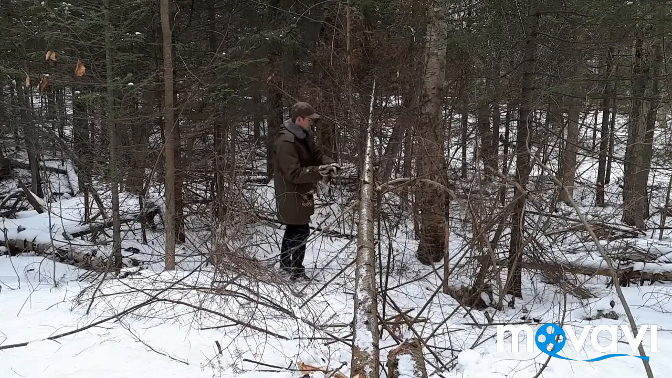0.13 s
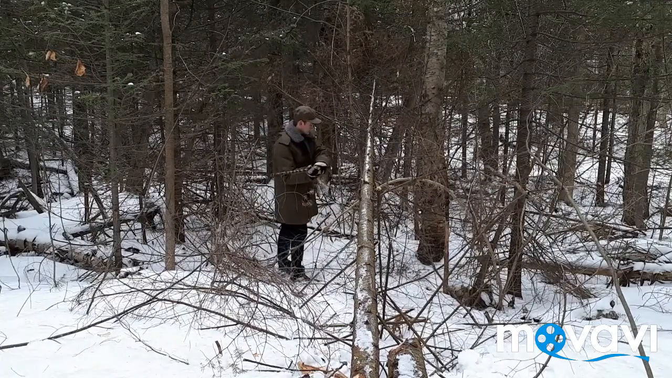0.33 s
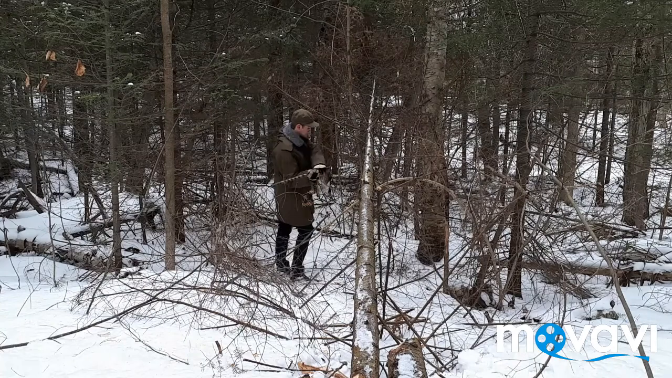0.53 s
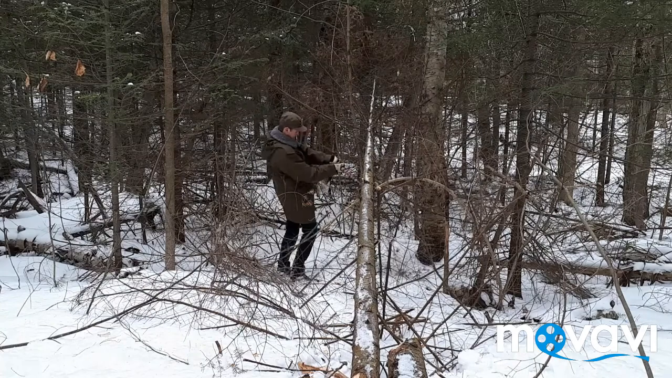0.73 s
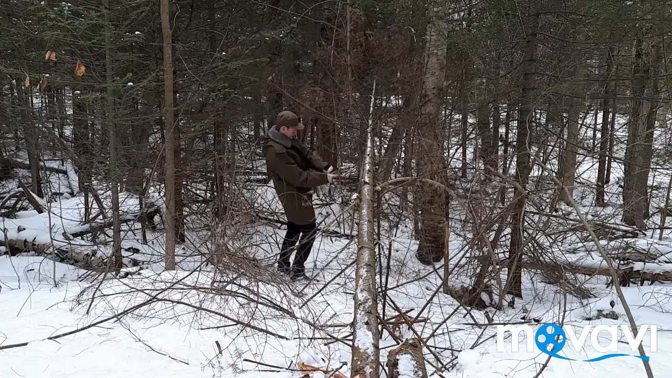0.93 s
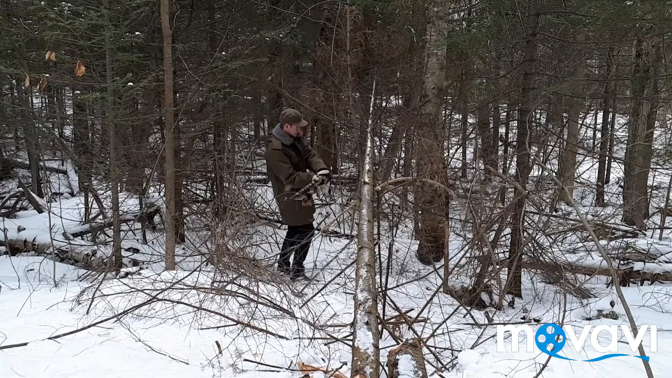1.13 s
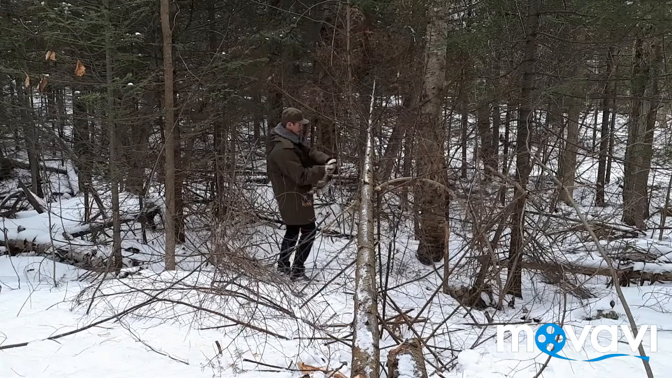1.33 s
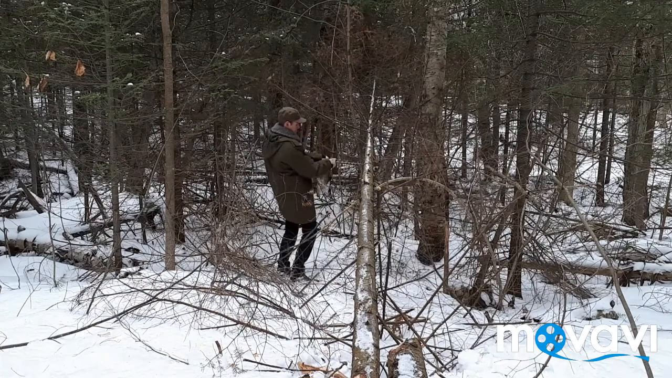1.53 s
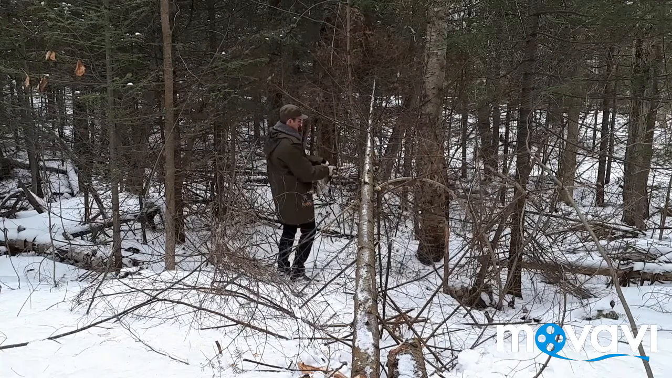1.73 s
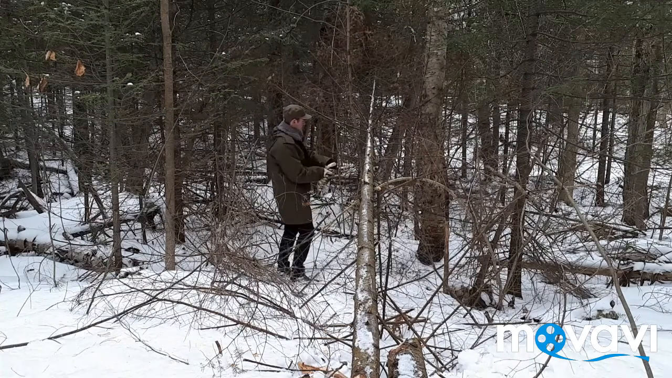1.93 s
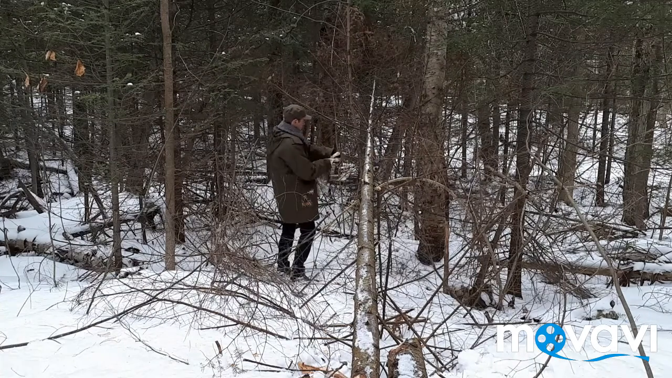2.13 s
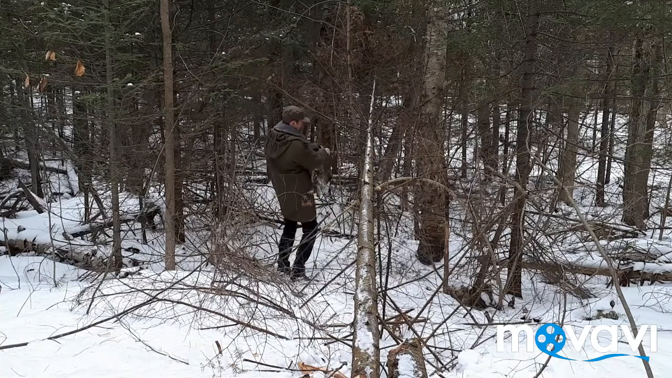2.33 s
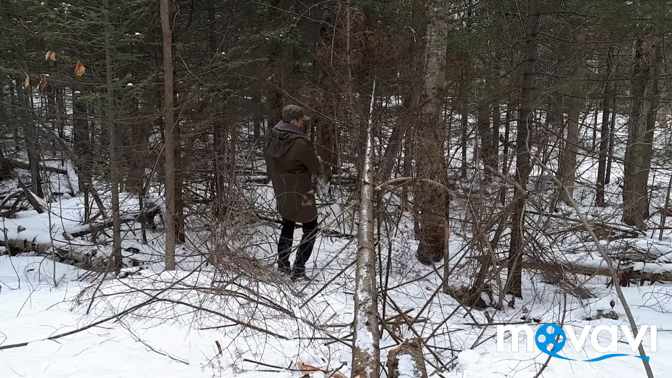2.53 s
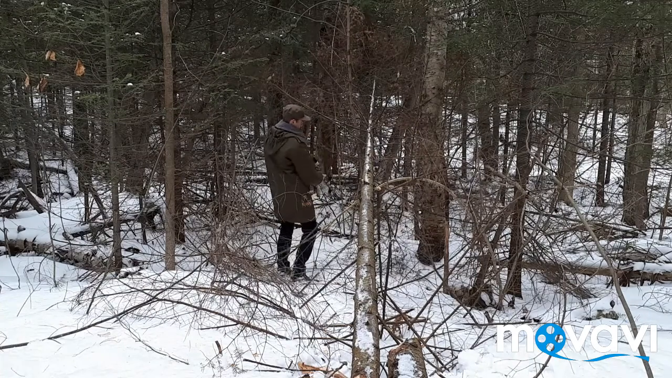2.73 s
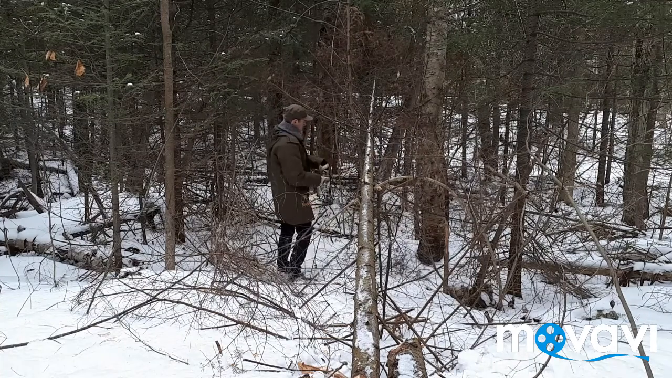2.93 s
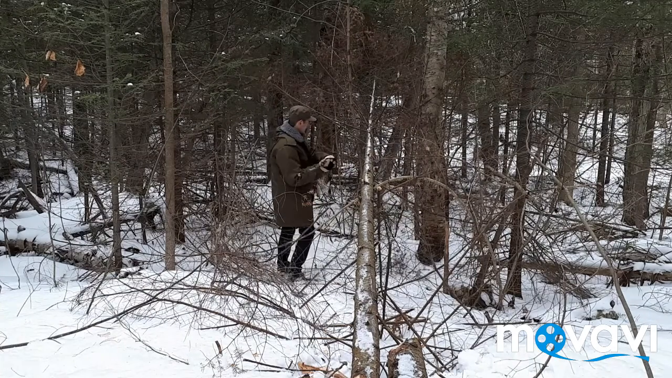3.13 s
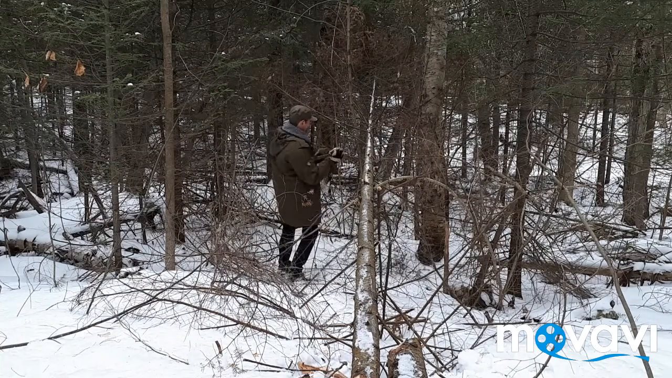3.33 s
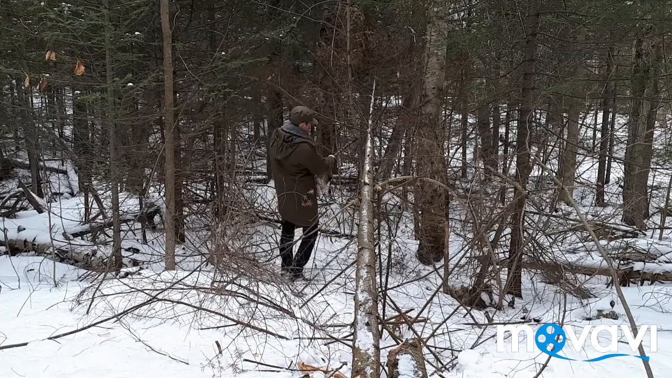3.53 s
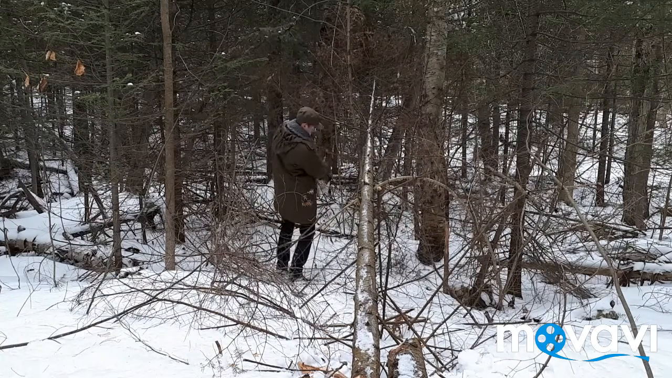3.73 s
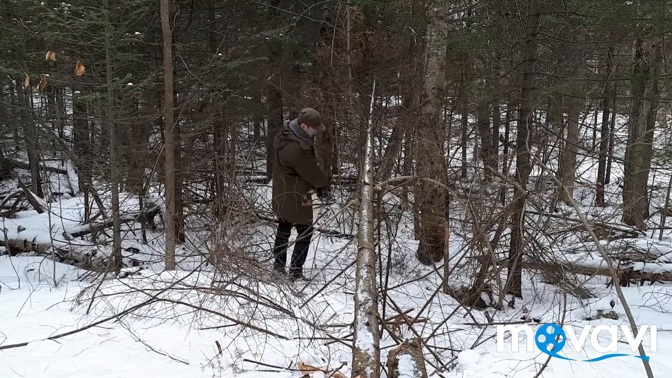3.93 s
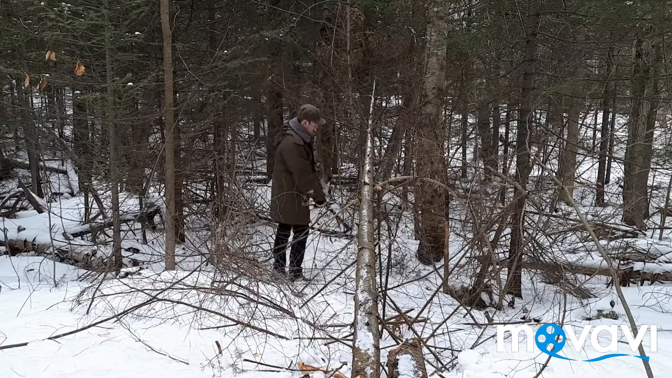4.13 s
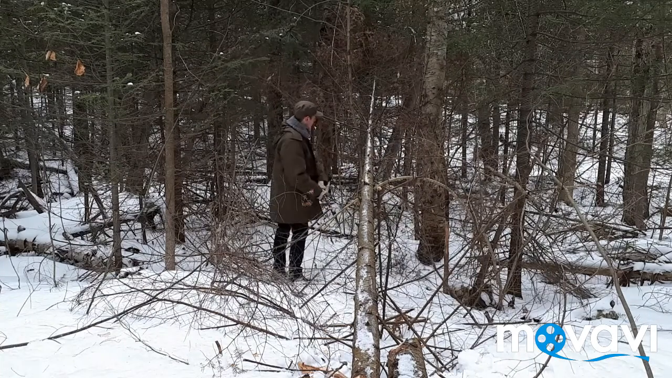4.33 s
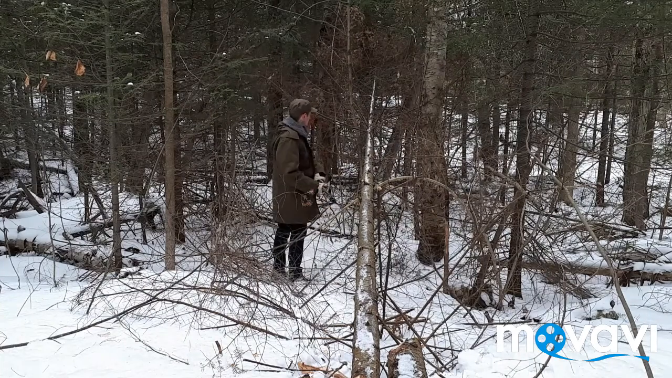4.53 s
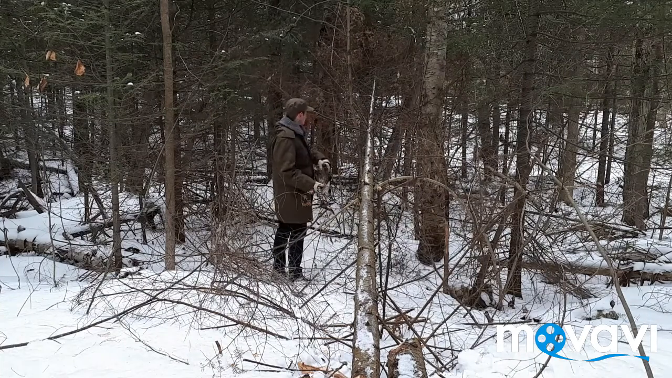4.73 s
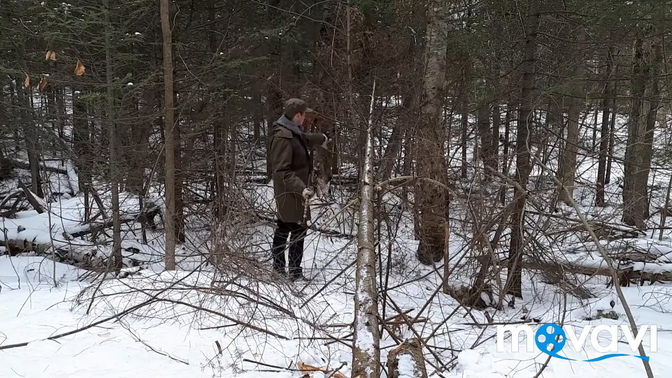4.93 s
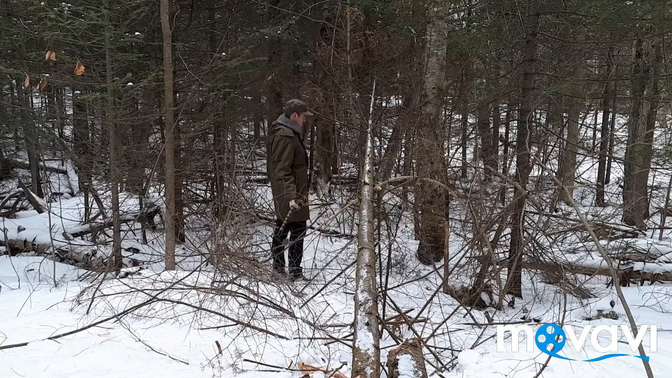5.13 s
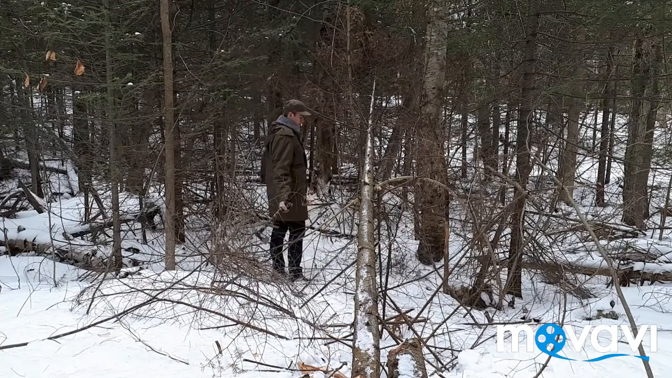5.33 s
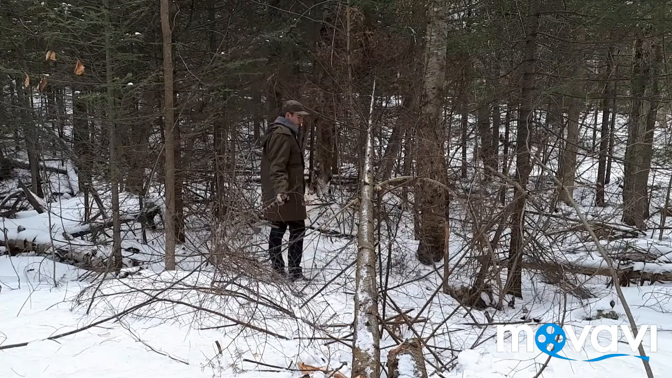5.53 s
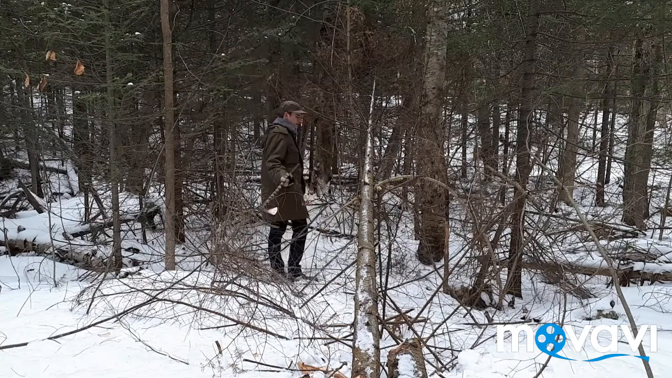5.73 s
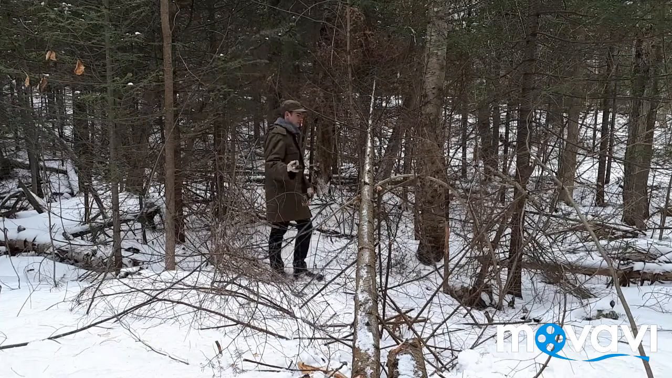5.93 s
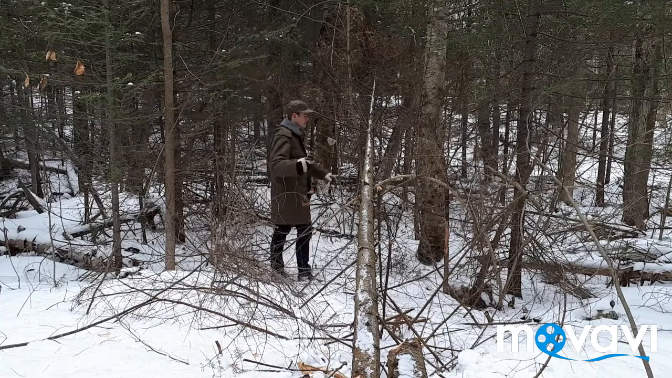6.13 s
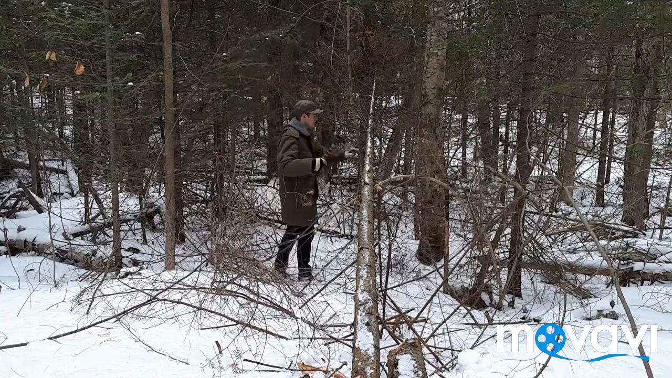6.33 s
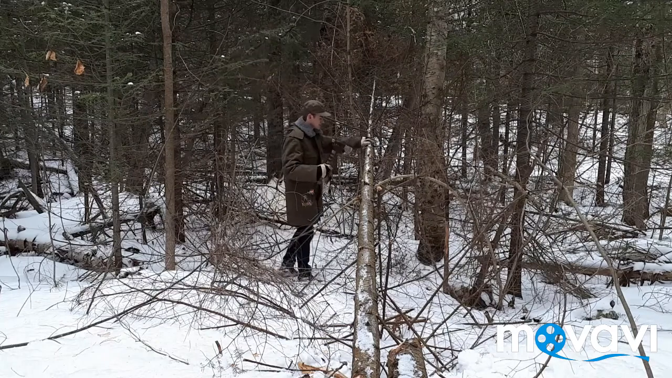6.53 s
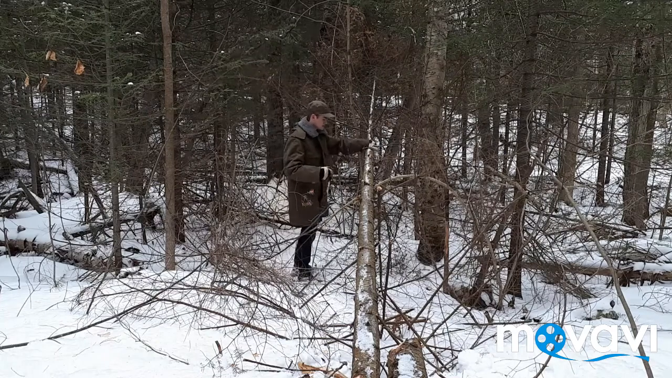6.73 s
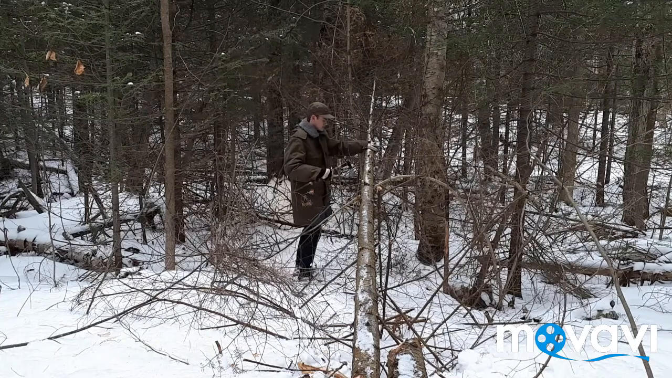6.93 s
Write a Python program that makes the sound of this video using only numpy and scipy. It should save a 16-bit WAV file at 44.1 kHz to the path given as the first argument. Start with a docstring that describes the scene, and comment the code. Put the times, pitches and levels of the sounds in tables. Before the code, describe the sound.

A quiet winter forest with a low, soft distant roar and very faint hiss. At 0.8 s a blade strikes a dead branch: a very loud, dry crack with a low falling knock and brief thin steel ring, scattered by surrounding trunks for about half a second. At 1.5 s a lighter blow rings more brightly, with smaller snaps at 1.6 and 1.7. At 2.3 s another loud splintering crack has a firm knock, then twigs brush and settle until about 3.1. A small tick at 3.2 precedes a deep, duller cluster of cracks at 3.57-3.64. The background dips around 4.3 s and returns. Dry twigs scrape clearly at 5.1-5.4 with a barely audible blade touch, followed by faint scrapes and coat rustle to 6.3. A thin twig snaps at 6.53, and a soft sleeve swish passes at 6.75. Stereo microphone several metres away.

```python
"""Dead branches are knocked off a spruce in a snowy forest: a falling chirp and modes make each
low knock, and short bursts of shaped noise make the cracks, scattered back by the trunks around.
A steel blade bites with a small burst and rings faintly in a few dying modes.
Twigs brush and a coat swishes as clumpy filtered noise, over the noise of a low, distant roar and
a faint hiss; the background level dips for about a second and comes back, the hiss dipping less."""
import sys
import numpy as np
from scipy import signal
from scipy.fft import rfft, irfft
from scipy.io import wavfile

SR = 44100
rng = np.random.default_rng(int(sys.argv[2]) if len(sys.argv) > 2 else 0)


def master(y):
    """Save y as 16-bit WAV."""
    cut = np.clip(np.atleast_2d(y).T, -1, 1)
    pcm = np.round(cut * 32767)  # scale
    wavfile.write(sys.argv[1], SR, pcm.astype(np.int16))


N = 307818

# How alike the two channels are in diffuse sound. Each row: pitch in Hz, coherence from 0 to 1.
COHERENCE = [(60, 0.81), (130, 0.98), (290, 0.88), (640, 0.19), (1400, 0.051), (16000, 0.038)]
# Noise colours of the distant roar and the faint hiss. Each row: pitch in Hz, relative dB per Hz.
ROAR_SPECTRUM = [(12, -57), (20, -28), (92, -6.5), (234, -1.5), (377, -2), (414, -2), (514, -5.5),
                 (752, -11.5), (828, -11.5), (911, -15), (1050, -17), (1500, -29.5), (2730, -40),
                 (5450, -48.5), (6000, -44), (7800, -74), (13200, -120)]
HISS_SPECTRUM = [(500, -4), (2000, 2), (4000, 0), (6500, -2), (7600, 2), (8800, -4), (12000, -3),
                 (15500, -2.5)]
# Noise colours of coat, sleeve and scraping twigs. Each row: pitch in Hz, relative dB per Hz.
COAT_SPECTRUM = [(1000, -22), (4000, -14), (6500, -10), (7400, 0), (7900, 0), (8600, -15), (15500, -15)]
SLEEVE_SPECTRUM = [(200, -19), (900, -2), (2200, 0.5), (3500, -2), (5300, 1), (7900, -1), (9000, -9.5),
                   (15500, -12)]
TWIG_SPECTRUM = [(300, -21), (1500, 1), (2500, -5.5), (5000, -1), (7700, 5.5), (9200, -3.5), (12500, 3),
                 (15500, -6)]
# The coat rubs on itself with each move of the body.
# Each row: middle in seconds, level in dB, half length in seconds.
BODY_MOVES = [(0.576, -79, 0.064), (1.29, -77, .16), (2.003, -77.5, 0.17), (2.8, -77.5, 0.5),
              (5.286, -75, 0.19), (5.905, -75, .09), (6.309, -79, .1), (6.852, -74, 0.13)]
# Twigs bend, slip past and settle.
# Each row: slip in seconds, level in dB, rise and fade time constants in seconds.
TWIG_BRUSHES = [(1.298, -73.5, .008, 0.017), (2.5, -70, .04, 0.38), (2.7, -69.5, 0.11, 0.075),
                (3.07, -69.5, 0.083, 0.071), (5.125, -60, .016, 0.2), (5.25, -59.5, .035, 0.068),
                (5.535, -77, .005, 0.035), (5.645, -72.5, .005, .03), (5.89, -67.5, .005, 0.072),
                (6.155, -72, .005, 0.055), (6.325, -75, .02, .035)]
# The forest's late answer. Each row: pitch in Hz, time to fall by 60 dB in seconds.
FOREST_DECAY = [(100, .3), (350, .35), (900, .55), (1800, .62), (4000, .55), (8000, .52), (15500, .47)]
# Basic colour of splintering wood. Each row: pitch in Hz, relative dB per Hz.
SPLINTER_SPECTRUM = [(40, -30), (150, -12), (400, -4), (800, 1), (1100, -3), (2300, .5), (3200, -2.5),
                     (4300, -.5), (5600, -3.5), (7600, 2), (8900, -7.5), (12000, -4), (15500, -5)]
# Modes of the steel blade, then of a branch.
# Each row: pitch in Hz, relative level in dB, time to fall by 60 dB in seconds.
BLADE_MODES = [(1722, -17, 0.1), (4130, -9.5, 0.13), (6730, 0.5, 0.2), (6850, -5, 0.21)]
BRANCH_MODES = [(337, 1, 0.22), (481, -9.5, .14), (573.3, -6.5, 0.054), (715, -4, 0.071), (942, -13.5, .15),
                (1045, -11.5, 0.07), (1415, -10.5, 0.062)]
# The blade meeting wood.
# Each row: start in seconds, ring level in dB, ring tilt in dB per octave, bite level in dB.
BLADE_HITS = [(0.776, -42, 6, -27), (1.500, -52, 4, -30), (1.517, -36, 13, -24), (2.291, -48, 11, -36),
              (2.328, -38.5, 1, -19), (5.184, -65, -10.5, -40)]
# The bite as a small crack: decay constant in seconds, tilt in dB per octave, bass limit in Hz,
# resonance in Hz, echo level in dB against the burst.
BITE_PIECE = (.003, -1, 2500, 6700.5, 2)
# Branches flexing under a blow. Each row: start in seconds, level in dB, first and last pitch in Hz,
# upper bending wave in dB and branch ring in dB against the knock, ring pitch factor.
BRANCH_KNOCKS = [(0.7817, -20.5, 635, 282, -6, -8.5, 0.98), (1.5078, -29, 500, 232, 3.5, -10.5, 1.06),
                 (1.602, -37, 622, 380, -8.5, -8.5, 1.2), (2.3213, -42.5, 560, 263, 5.5, -5, 1.7),
                 (2.3367, -20.5, 500, 306, 2, -17, 0.99), (3.2065, -49.5, 600, 262, 5.5, -6, 1.0),
                 (3.5684, -23.5, 850, 199.5, -16.5, -10.5, .84), (3.5794, -28.5, 700, 300, 2, -14, 1.4)]
# Wood breaking; a thin twig has no bass. Each row: start in seconds, burst energy in dB,
# decay constant in seconds, tilt in dB per octave, bass limit in Hz, resonance in Hz,
# echo level in dB against the burst.
WOOD_CRACKS = [(0.7889, -0.5, 0.00034, 0, 400, 7700, 2), (0.794, -1.5, 0.0071, 0, 200, 14200, 3),
               (0.7997, -10.5, 0.00055, -.5, 200, 2352, 8), (1.5141, -9, 0.003, -0.2, 200, 4170, 4),
               (1.567, -19, 0.0023, -4.5, 500, 2100, 1), (1.6033, -5, 0.0014, 3.5, 400, 12200, -5.5),
               (1.7250, -19.5, 0.0025, 4.5, 1500, 13000, -1.5), (2.29, -16, .0006, 2, 5000, 6660, -6),
               (2.3428, -1, 0.0079, 3, 201.5, 14500, -18.5), (2.345, -4.5, 0.0061, -1.5, 200, 4590, -2.5),
               (3.207, -18, 0.00071, 0.7, 792.5, 6000, -5), (3.575, -10, 0.0022, -6, 300, 4500, -0.5),
               (3.5874, -6.5, .001, -1, 300, 4200, 5.5), (3.595, -6, 0.0053, -1.5, 202, 2015, -1.5),
               (3.605, -8, 0.0044, -2.5, 300.8, 6050, 0), (3.6366, -15, 0.0009, -2, 300, 2200, -2.5),
               (6.5329, -23, 0.0035, 0, 2200, 14600, 1.5), (6.5351, -10.5, .0004, 3, 5000, 10800, -23)]

ROAR_DB, DIP_DB, DIP_AT_S, DIP_HALF_S = -55, -6.5, 4.28, 0.52
COAT_REST_DB = -91.5
SWISH_AT_S, SWISH_DB, SWISH_HALF_S = 6.755, -57.5, 0.069
# the upper wave is higher and so shorter
KNOCK_CYCLES, UPPER_RATIO, UPPER_LAG_S, KNOCK_ECHO_DB = 2.5, 2.5, .001, -5.5
# the first torn fibres, in the columns of the bite; their energy is set against the knock
TEAR_PIECE, TEAR_DB, TEAR_LAG_S = (0.05, -5.5, 300, 2500, 0), 5.5, .0018
LEFT_DELAY = np.sinc(np.arange(8) - 1.5)  # one and a half samples between the microphones
EDGE_HZ = 15850


def amp(db):
    """Decibels to gain."""
    return 10 ** (np.asarray(db) / 20)


def read(points, hz):
    """A table read on a log-frequency axis."""
    f, value = np.transpose(points)
    return np.interp(np.log(hz + 1), np.log(f + 1), value)


def unit(x):
    """Scales to an energy of one, averaged over the channels."""
    return x / np.sqrt(np.mean(np.sum(x ** 2, -1)) + 1e-20)


def add(mix, s, sound):
    """Mixes a sound in at time s."""
    part = mix[:, max(round(s * SR), 0):][:, :sound.shape[-1]]
    part += sound[..., :part.shape[1]]


def colour(x, spectrum, size=1024):
    """Causal filter with the shape of a spectrum; its overall gain is left free."""
    cepstrum = irfft(np.log(amp(read(spectrum, np.fft.rfftfreq(size, 1 / SR)))))
    # folding the cepstrum forward in time gives the minimum-phase response
    n = np.arange(size)
    fold = 2 * (n < size // 2) * (n > 0)
    taps = irfft(np.exp(rfft(cepstrum * fold)))
    return signal.oaconvolve(x, taps[None], axes=1)[:, :x.shape[1]]


def diffuse(size):
    """Noise from all sides: alike in both channels in the bass only."""
    a, b = rfft(rng.standard_normal((2, size)))
    same = np.clip(read(COHERENCE, np.fft.rfftfreq(size, 1 / SR)), -1, 1)
    return irfft([a, same * a + np.sqrt(1 - same ** 2) * b], size)


def lumps(size, per_s, depth_db):
    """A random gain that takes a new course per_s times a second."""
    knots = rng.standard_normal(size // 8)
    position = np.arange(size) * per_s / SR
    return amp(depth_db * np.interp(position, np.arange(len(knots)), knots))


def swell(middle_s, half_s, steepness=2):
    """A smooth bump from 0 to 1 and back."""
    return np.exp(-abs((np.arange(N) / SR - middle_s) / half_s) ** steepness)


def background(hiss_db=-82.5, hiss_share=.5):
    """A low, far roar through the trees and a faint hiss; the level dips once, the hiss less."""
    dip_db = DIP_DB * swell(DIP_AT_S, DIP_HALF_S, steepness=3.9)
    roar = unit(colour(diffuse(N) * lumps(N, 12, 0.65), ROAR_SPECTRUM, size=8192))
    hiss = unit(colour(diffuse(N), HISS_SPECTRUM))
    roar_gain = amp(ROAR_DB + dip_db)
    hiss_gain = amp(hiss_db + hiss_share * dip_db)
    return np.sqrt(N) * (roar * roar_gain + hiss * hiss_gain)


def rubbing(spectrum, effort, grain_db, clump_db, sway_db=2.5):
    """Friction: tiny slips that come in clumps, as strong as the uneven movement."""
    grains = diffuse(N) * lumps(N, 2300, grain_db)
    slips = grains * lumps(N, 70, clump_db) * lumps(N, 12, sway_db)
    return effort * np.sqrt(N) * unit(colour(slips, spectrum))


def cloth():
    """The coat's thin rustle, and the fuller swish of a sleeve as the arm sweeps out once."""
    moving = amp(COAT_REST_DB) + sum(amp(db) * swell(s, half_s) for s, db, half_s in BODY_MOVES)
    sweep = amp(SWISH_DB) * swell(SWISH_AT_S, SWISH_HALF_S, steepness=1.9)
    rustle = rubbing(COAT_SPECTRUM, moving, grain_db=3.5, clump_db=1.55, sway_db=3.0)
    swish = rubbing(SLEEVE_SPECTRUM, sweep, grain_db=2.0, clump_db=1.2, sway_db=-0.2)
    return rustle + swish


def slip(s, rise_s, fade_s):
    """A gain that grows to 1 at time s and then dies away."""
    t = np.arange(N) / SR - s
    return np.exp(np.maximum(-t, 0) / -rise_s - np.maximum(t, 0) / fade_s)


def twigs():
    """Dry twigs scraping past the arms and each other, their slips summed in power."""
    slips = [amp(db) * slip(s, rise_s, fade_s) for s, db, rise_s, fade_s in TWIG_BRUSHES]
    effort = np.linalg.norm(slips, axis=0)
    return rubbing(TWIG_SPECTRUM, effort, grain_db=3.5, clump_db=2.8, sway_db=2.3)


def scatter(x, near_t60, far_db, rise_s, lumpy_db):
    """Echoes from the near trunks die fast; the deeper forest answers softly and for longer."""
    t = np.arange(SR) / SR
    near = diffuse(SR) * lumps(SR, 900, lumpy_db) * amp(-60 * t / near_t60)
    # the far answer dies at its own rate in each frequency band
    hz, at, bands = signal.stft(diffuse(SR) * lumps(SR, 150, 1.7), SR, nperseg=256)
    fall = amp(far_db - 60 * at / read(FOREST_DECAY, hz)[:, None])
    far = signal.istft(bands * fall, SR, nperseg=256)[1][:, :SR]
    echoes = unit((near + far) * (1 - np.exp(-t / rise_s)))
    return signal.fftconvolve(x, echoes, axes=1)[:, :SR]


def ring(modes, factor=1, tilt_db=0):
    """Dying modes, each reaching the two microphones a little apart."""
    t = np.arange(SR // 2) / SR
    lags_s = np.array([[0], [1]]) * rng.uniform(0, .00008, (len(modes), 1, 1))
    out = np.zeros((2, len(t)))
    for (hz, db, t60), lag in zip(modes, lags_s):
        tilt = tilt_db * np.log2(hz / modes[2][0])  # pivots on the third mode
        out += amp(db - 60 * t / t60 + tilt) * np.sin(2 * np.pi * hz * factor * (t + lag))
    return (1 - np.exp(-t / 0.0012)) * out


def wood(tilt_db, lowest_hz, resonance_hz, bump_db, octaves=0.23):
    """The spectrum of one piece of wood: splinter noise with a bass limit and one broad resonance."""
    hz = np.geomspace(40, 18000, 160)
    bass_db = -10 * np.log10(1 + (lowest_hz / hz) ** 4)
    bump = bump_db * np.exp(-(np.log2(hz / resonance_hz) / octaves) ** 2)
    tilt = tilt_db * np.log2(1 + hz / 500)
    return np.column_stack([hz, read(SPLINTER_SPECTRUM, hz) + tilt + bass_db + bump])


def crack(decay_s, tilt_db, lowest_hz, resonance_hz, echo_db):
    """A burst of tearing fibres, a little to the right, followed by its echoes."""
    out, t = np.zeros((2, SR)), np.arange(4096) / SR
    timbre = (tilt_db, lowest_hz, resonance_hz)
    envelope = np.exp(-t / decay_s) * (1 - np.exp(-t / 0.00017))
    fibres = rng.standard_normal((2, len(t))) * lumps(len(t), 3000, 2.5) * envelope
    left = unit(np.convolve(fibres[0], LEFT_DELAY)[:len(t)])  # the far microphone hears it later
    right = amp(1.2) * unit(fibres[0] + .7 * fibres[1])
    # the shorter the break, the more the piece's own resonance stands out
    purity_db = 4 + 18 * np.exp(-decay_s / .0005)
    add(out, 0, unit(colour(np.array([left, right]), wood(*timbre, bump_db=purity_db))))
    click = signal.unit_impulse(len(t))[None]
    source = unit(colour(click, wood(*timbre, bump_db=2.0)))
    echoes = scatter(source, near_t60=0.18, far_db=-8, rise_s=0.0012, lumpy_db=4.5)
    add(out, .0015, amp(echo_db) * echoes)
    return out


def clinks():
    """The blade bites the bark and its steel modes ring thinly."""
    out = np.zeros((2, N))
    for s, db, tilt_db, bite_db in BLADE_HITS:
        add(out, s, amp(db) * ring(BLADE_MODES, tilt_db=tilt_db))
        add(out, s, amp(bite_db) * crack(*BITE_PIECE))
    return out


def bend(first_hz, last_hz):
    """Bending waves run faster at high pitch, so they arrive as a quick falling chirp."""
    u = np.linspace(0, 1, int(KNOCK_CYCLES / last_hz * SR))
    hz = last_hz + (first_hz - last_hz) * np.exp(-u / .27)
    return np.sin(np.pi * u ** 0.88) * np.sin(2 * np.pi * np.cumsum(hz) / SR)


def knocks():
    """Two bending waves and their echoes, then the branch rings; its first fibres tear."""
    out = np.zeros((2, N))
    for s, db, first_hz, last_hz, upper_db, ring_db, factor in BRANCH_KNOCKS:
        waves = (0, db, 1), (UPPER_LAG_S, db + upper_db, UPPER_RATIO)
        for lag, wave_db, ratio in waves:
            chirp = amp(wave_db) * bend(first_hz * ratio, last_hz * ratio)
            add(out, s + lag, chirp)
            echoes = scatter(chirp[None], near_t60=0.13, far_db=-11.0, rise_s=0.0023, lumpy_db=0.5)
            add(out, s + lag + len(chirp) / SR / 2, amp(KNOCK_ECHO_DB) * echoes)
        half_knock_s = KNOCK_CYCLES / last_hz / 2
        add(out, s + half_knock_s, amp(db + ring_db) * ring(BRANCH_MODES, factor))
        add(out, s + TEAR_LAG_S, amp(db + TEAR_DB) * crack(*TEAR_PIECE))
    # a slender branch radiates little deep bass
    return signal.sosfilt(signal.butter(2, 50, "high", fs=SR, output="sos"), out)


def cracks():
    """Branches and twigs giving way, each as a burst of tearing fibres."""
    out = np.zeros((2, N))
    for s, db, *piece in WOOD_CRACKS:
        add(out, s, amp(db) * crack(*piece))
    return out


def scene():
    """The forest, the person's movements and the breaking wood."""
    return background() + cloth() + twigs() + clinks() + knocks() + cracks()


def record(dry):
    """A steep limit to the treble."""
    taps = signal.firwin(511, EDGE_HZ, window=("kaiser", 9), fs=SR)
    return signal.oaconvolve(dry, taps[None], "same")


dry = scene()
out = record(dry)
master(out)
```